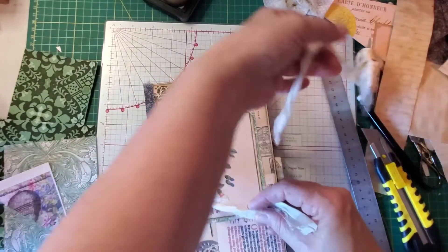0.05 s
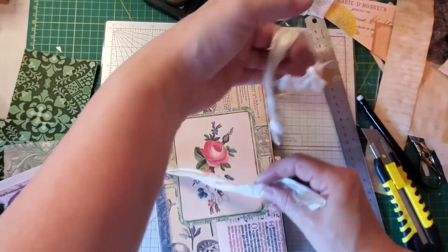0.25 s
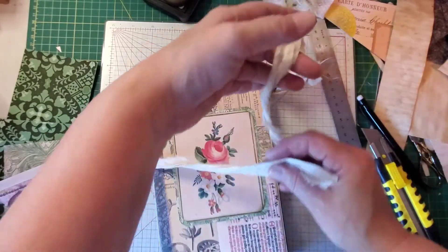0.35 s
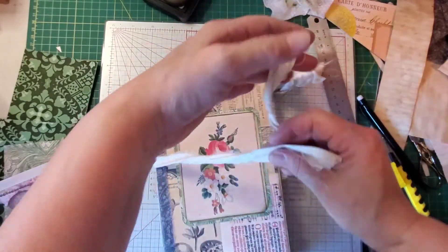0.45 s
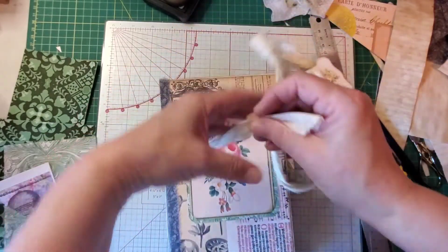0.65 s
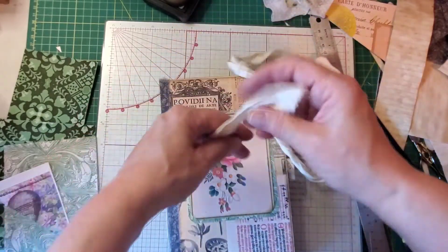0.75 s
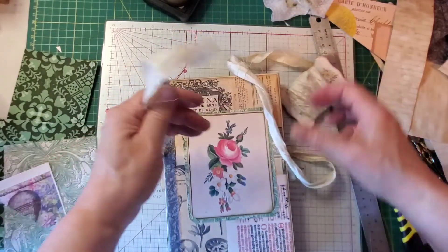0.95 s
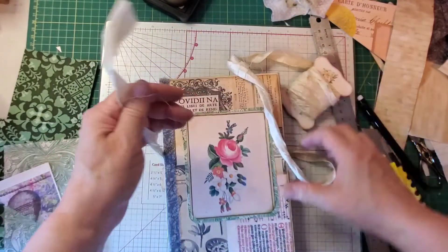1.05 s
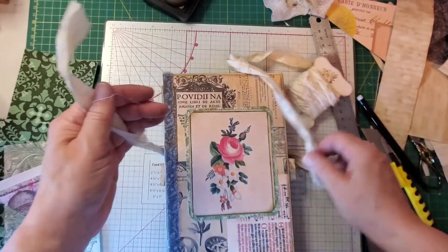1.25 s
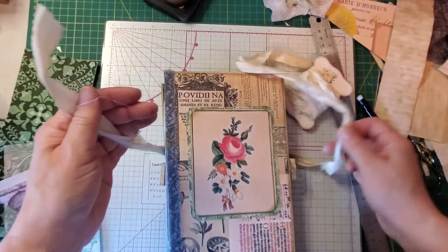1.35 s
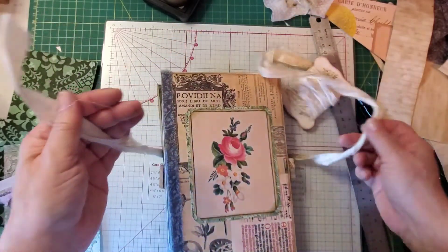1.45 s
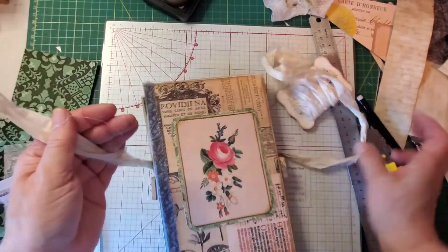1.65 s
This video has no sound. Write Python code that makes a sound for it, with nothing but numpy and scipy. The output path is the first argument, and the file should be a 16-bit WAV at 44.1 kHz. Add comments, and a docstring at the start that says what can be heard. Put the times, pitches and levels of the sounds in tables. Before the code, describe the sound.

A stiff card wound with cloth lands with two light knocks and scrapes over papers on a table in jerky, fading strokes; then silk rustles faintly with tiny ticks. Close stereo microphone, quiet small room.

```python
"""A stiff card wound with cloth strip lands on a craft table and is dragged across papers in fading jerks.
Tiny random slips and sudden jolts ring the card and table top under a wide scrape; two knocks ring the wood.
Afterwards silk whispers as fine filtered slips and ticks as noise bursts, and a knuckle touches the table.
Filtered noise makes the low rumble and hiss of a quiet room throughout; reflections surround the handling."""
import sys
import numpy as np
from scipy import signal
from scipy.io import wavfile
from scipy.ndimage import uniform_filter1d

SR = 44100
rng = np.random.default_rng(int(sys.argv[2]) if len(sys.argv) > 2 else 0)


def invert_db(x):
    """Field ratio 10**(x/20) for x, a level in decibels (scalar or array-like)."""
    u = np.asarray(x, float) / 20
    return 10 ** u


def dump_mix(stems):
    """Bounce the given channels to the path in sys.argv[1] as a 16-bit WAV at rate SR."""
    frames = np.atleast_2d(stems).T  # one column per channel
    limited = np.clip(frames, -1, 1)  # hard clip at full scale
    pcm = np.round(limited * 32767).astype(np.int16)
    wavfile.write(sys.argv[1], SR, pcm)


N = 74970
T = np.arange(N) / SR


def evened(x):
    """Scales to rms 1."""
    return x / np.sqrt(np.mean(x ** 2) + 1e-20)


def read(points, hz):
    """Value of a table on a log-frequency axis."""
    f, value = np.transpose(points)
    return np.interp(np.log(hz + 1), np.log(f + 1), value)


def colour(x, spectrum, unit=True):
    """Minimum-phase filter, of unit energy if asked."""
    hz = np.abs(np.fft.fftfreq(4096, 1 / SR))
    log_gain = read(spectrum, hz).clip(-100) * np.log(10) / 20
    taps = np.fft.ifft(np.exp(np.conj(signal.hilbert(log_gain)))).real[:2048]
    if unit:
        taps = taps / np.linalg.norm(taps)
    return signal.oaconvolve(x, taps)[:N]


def resonate(x, hz, width):
    """One resonance of gain 1 that follows hz: shift it to zero, smooth, shift back."""
    turn = np.exp(2j * np.pi * np.cumsum(hz * np.ones(N)) / SR)
    r = np.exp(-np.pi * width / SR)
    return 2 * (turn * signal.lfilter([1 - r], [1, -r], x / turn)).real


def slips(per_s, spread_db):
    """Friction as tiny slips of uneven size and either sign at random instants, scaled to rms 1."""
    size = invert_db(spread_db * np.minimum(rng.exponential(1, N), 5)) * rng.choice([-1., 1.], N)
    return evened(size * (rng.random(N) < per_s / SR))


def puffs(times, dbs, t60):
    """Bursts of noise that start at once and die away."""
    envelope = np.zeros(N)
    for s, db in zip(times, dbs):
        envelope += (T >= s) * invert_db(db - 60 * np.abs(T - s) / t60)
    return envelope * rng.standard_normal(N)


def drag():
    """Slips of the card edge shake the rings of card and table, a wide scrape, a fizz and the table's boom."""
    # course of the drag: t/s, level/dB, then against that level: treble/dB,
    # bass/dB (before a 2 dB lift), boom/dB, ringing/dB
    course = [
        [(0.0, -53, 2.5, -3, -9, 7), (0.014, -51, -7.5, -3, -32, -1), (0.034, -56, 7.5, 5, -0.5, 6.2),
         (0.042, -52, -5, -5.5, 0.5, 0), (0.066, -68, 6, 5, -15, -8), (0.074, -58.5, -16, 17, 4.5, -3.5),
         (0.1, -72, 8, 10.5, 17.5, 4)],
        [(0.2, -79.5, 2.5, -4, 7, -7), (0.206, -91, -6, -5.5, 23, -22), (0.218, -28.5, -11.5, 0, -29.5, 1),
         (0.234, -24, -3.5, -9, -18.5, 6.6), (0.252, -22.5, -6, -13, -20.5, -2.3),
         (0.286, -34, -2, 3, -13, 3.3), (0.306, -23.5, -7, -2.5, -20.5, 1),
         (0.36, -38.5, -6.5, -29, -14.5, 0.4), (0.396, -35.5, -10, -29, -18.5, -1),
         (0.43, -47.5, -7.5, 1, -13, -0.5)],
        [(0.44, -50, -13, 1, -15.5, 1.5), (0.488, -45.5, -9.5, 1, -23, -4.2),
         (0.504, -40, -15, -16, -17.5, 1.4), (0.558, -45.5, -18.5, 0.5, -15.5, -9),
         (0.592, -44.5, -17.5, -33, -12, -1.4), (0.64, -68.5, -9.5, -23, -6, -8)],
        [(0.65, -56, -11, -10, -10, -5), (0.672, -54.5, -10, -8.5, -12, -5)],
        [(0.68, -48, -16, -13, -10.5, 1.5), (0.716, -42.5, -16.5, -19, -17.5, -8.1),
         (0.754, -53, -15, -17, -10.5, -8), (0.76, -62, -7, -11, -5, -4)],
        [(0.775, -63.5, -11.5, -2, -4.5, -4), (0.831, -84, 8.5, 16.5, 14.5, -5), (0.865, -90, 9, -6, 18, -6),
         (0.875, -100, 20, 16, 32, 4), (0.893, -93, 8.5, -1, 17, -14), (0.9, -95, 8, -7, 21.5, -1.8)],
    ]
    # the edge catches and jumps: t/s, starting level/dB
    jolts = [(0.2213, -25), (0.2326, -23.5), (.2375, -24), (0.249, -20), (0.262, -24.5), (0.266, -25),
             (0.293, -22.5), (0.2999, -22), (0.304, -28), (0.313, -24), (.388, -30.5), (0.709, -38.5)]
    # rings of card and table top: f/Hz, width of the narrower stage/Hz, relative level/dB
    modes = [(801.4, 79, -8.5), (1019.3, 25, -0.5), (1705, 20, -6), (2086, 31, -13), (2554.5, 19, 4.5),
             (2797, 13, -11), (3200, 69, -12), (3497, 110, 5.5), (3614, 110, 0.5), (3730, 60.03, -14),
             (5030, 60, -13), (6225, 100, -14.5)]
    # broad colour of the scrape: f/Hz, relative level/dB
    wide_colour = [(250, -46.5), (500, -13.5), (900, -5), (1280, -12), (1800, -6), (3000, -3.5), (4000, -9),
                   (4600, -20.5), (6500, -20), (7200, -30), (9000, -66)]
    # treble of the scrape: f/Hz, relative level/dB
    fizz_colour = [(2940, -32.5), (5000, -3.5), (5390, -5.5), (6160, -0.5), (7290, -10), (8170, -0.5),
                   (14200, -5.5), (15900, -21), (16400, -34)]
    # table under the drag: f/Hz, relative level/dB
    boom_colour = [(50, -41), (120, -13), (165, 0.9), (225, -13.5), (310, -6), (450, -13.5), (700, -26),
                   (1500, -61.5)]
    rings_db, wide_db, bass_edge_hz, jolt_t60_s = -3.5, -6, 1700, 0.025
    wander = 0.0098  # share by which the rings drift as the grip changes

    s, level_db, treble_db, bass_db, boom_db, ring_db = np.vstack(course).T
    grit = slips(9000, 1.5)
    rub = grit * invert_db(np.interp(T, s, level_db)) + puffs(*np.transpose(jolts), jolt_t60_s)
    top, low, deep = (rub * invert_db(np.interp(T, s, db)) for db in (treble_db, bass_db, boom_db))
    # below the edge the bass takes the place of the plain rub
    bass_filter = signal.butter(2, bass_edge_hz, fs=SR)
    both = rub + signal.lfilter(*bass_filter, low * invert_db(2.0) - rub)

    drift = rng.standard_normal((len(modes), int(T[-1] / .05) + 2))
    bends = [1 + wander * np.interp(T, np.linspace(0, T[-1], len(d)), d) for d in drift]

    def ringing(x):
        """Sums the drifting modes, each a wide and a narrow resonance in series."""
        out = np.zeros(N)
        for (hz, width, db), bend in zip(modes, bends):
            out += invert_db(db) * resonate(resonate(x, hz * bend, 3 * width), hz * bend, width)
        return out

    rings = ringing(both * invert_db(np.interp(T, s, ring_db))) / np.std(ringing(grit))
    scrape = invert_db(rings_db) * rings + invert_db(wide_db) * colour(both, wide_colour)
    return scrape + colour(top, fizz_colour) + colour(deep, boom_colour)


def knocks():
    """Each knock rings the wood most near its own region, duller for a longer contact, with a short crack."""
    # two as the card lands, then the knuckle:
    # t/s, peak of the ring/dB, crack against that peak/dB, strongest region f/Hz, contact/s
    hits = [(0.0739, -39, -22, 483, 0.00019), (0.1074, -33.5, 1.5, 515, 0.00036),
            (1.5327, -45, -42, 250, 0.00084)]
    # modes of the wood: f/Hz, relative level/dB, t60/s
    wood = [(68.1, 3.8, .14), (160.7, -9.5, 0.11), (324, -5, .07), (415.6, -1, 0.069), (496, -2.6, 0.077),
            (606, -3.5, .12), (700, -3.5, .06), (2500, -4, .015)]
    # f/Hz, relative level/dB
    crack_colour = [(470, -33), (800, -4.5), (1770, -7), (3590, -5), (5060, -10.5), (6510, -19.5),
                    (11100, -17), (16400, -25.5)]
    crack_t60_s, tail_db, tail_t60_s = 0.0067, -17.5, .2
    region_db_per_octave = -6.

    s, peak_db, crack_db, _, _ = np.transpose(hits)
    crack = puffs(s, peak_db + crack_db, crack_t60_s)
    crack_tail = puffs(s, peak_db + crack_db + tail_db, tail_t60_s)
    out = colour(crack + crack_tail, crack_colour)
    for at, knock_db, _, region_hz, contact in hits:
        t = np.maximum(T - at, 0)
        ring = np.zeros(N)
        for hz, db, t60 in wood:
            mode_db = db + region_db_per_octave * abs(np.log2(hz / region_hz))
            ring += invert_db(mode_db - 60 * t / t60) * np.sin(2 * np.pi * hz * t)
        # the contact's rounded push softens the treble
        ring = np.convolve(ring, np.hanning(int(2 * contact * SR) + 3))[:N]
        out -= invert_db(knock_db) * ring / abs(ring).max()
    return out


def silk():
    """A fine whisper with a duller body, and single snaps of thread with a brief ring each."""
    # silk in the fingers: t/s, level/dB, body against that level/dB
    whisper = [(.9, -78, -10), (.974, -94.5, -5.5), (1.003, -91.5, -5), (1.008, -77, -3), (1.024, -82, -19),
               (1.036, -77.5, -5.5), (1.076, -96, -1), (1.125, -94, -2.5), (1.13, -71.5, -9),
               (1.165, -81.5, -8.5), (1.177, -76.5, -5.5), (1.184, -70.5, -4.5), (1.24, -77, -6.5),
               (1.28, -82, -7.5), (1.286, -69, -2), (1.3, -74.5, -3.5), (1.379, -79.5, -11),
               (1.385, -68.5, -7), (1.425, -76.5, -8.5), (1.434, -63, -15), (1.448, -70.5, -18.5),
               (1.46, -64.5, -12), (1.49, -76, -5), (1.51, -70.5, -15.5), (1.54, -69.5, -9),
               (1.56, -79, -13), (1.596, -78.5, -6), (1.632, -93, 1), (1.7, -99, 1.5)]
    # threads snapping: t/s, starting level/dB, ring against that level/dB, ring f/Hz
    snaps = [(1.0056, -66, -4, 2670), (1.003, -74, 6, 5216), (1.0325, -65.5, -12, 700),
             (1.1274, -71, -6.5, 2216), (1.1345, -66, -10, 2100), (1.181, -64.5, 5.5, 680),
             (1.190, -71.5, 1.5, 1850), (1.221, -61.5, -1.5, 680), (1.24, -69, -7, 700),
             (1.284, -58.5, -5.5, 1250), (1.327, -64, -10.5, 1289), (1.346, -65.5, -12.5, 1271),
             (1.3828, -60, -11.5, 1796), (1.395, -67, -8, 1280), (1.434, -52.5, -22, 1260),
             (1.457, -58, -11, 1252), (1.476, -62, -17, 1404)]
    # fine top of the whisper and the snaps: f/Hz, relative level/dB
    top_colour = [(2940, -45), (5000, -12), (6600, -20), (7930, -8), (11900, -3), (13400, -6), (15300, -3),
                  (16400, -12)]
    # dull body: f/Hz, relative level/dB
    body_colour = [(290, -42), (500, -15.5), (655, -4), (983, -14.5), (1210, -5.5), (1510, -14),
                   (1990, -12), (2450, -13.5), (6000, -23), (7800, -50.5), (13200, -120)]
    slips_per_s, spread_db = 17000, 4
    snap_t60_s, ring_t60_s, ring_q = 0.017, 0.073, 5.1

    s, level_db, body_db = np.transpose(whisper)
    at, peak_db, _, _ = np.transpose(snaps)
    top = slips(slips_per_s, spread_db) * invert_db(np.interp(T, s, level_db, left=-120))
    top += puffs(at, peak_db, snap_t60_s)
    body = slips(slips_per_s, spread_db) * invert_db(np.interp(T, s, level_db + body_db, left=-120))
    out = colour(top, top_colour) + colour(body, body_colour)
    for start, tick_db, ring_db, hz in snaps:
        width = hz / ring_q
        burst = puffs([start], [tick_db + ring_db], ring_t60_s)
        ring = resonate(resonate(burst, hz, 2 * width), hz, width)
        out += ring * np.sqrt(SR / width / 2 / np.pi)  # makes up for the narrow band
    return out


def space(x):
    """Close reflections reach the two microphones in opposite ways; then the room tail."""
    # decay of the room: f/Hz, t60/s
    decay = [(200, .35), (800, .3), (1500, .22), (3000, .22), (6000, .22), (12000, .2)]
    # what differs between the two microphones: f/Hz, level against the centre/dB
    side_colour = [(60, -18), (200, -17.5), (400, -12.5), (800, -9), (1500, -0.5), (3000, 1), (5000, -1.6),
                   (8000, 1.24), (15000, -1.1)]
    room_db, left_db, near_s = -14.5, 1.5, 0.0031
    shifts_per_s = 4.3  # how fast the reflections change as the hands move

    # tail: sparse random echoes, faded band by band
    taps = np.zeros((2, SR // 2))
    slots = np.arange(300, SR // 2 - 20, 20)
    at = slots + rng.integers(0, 20, (2, len(slots)))
    np.put_along_axis(taps, at, rng.choice([-1., 1.], at.shape), 1)
    hz, t, z = signal.stft(taps, SR, nperseg=256)
    tail = signal.istft(z * invert_db(-60 * t / read(decay, hz)[:, None]), SR, nperseg=256)[1]
    tail *= invert_db(room_db) / np.linalg.norm(tail[0])

    # the sound swings between two patterns of close reflections
    near = rng.standard_normal((2, 1000)) * np.exp(-T[:1000] / near_s)
    near /= np.linalg.norm(near, axis=1)[:, None]
    turn = 2 * np.pi * shifts_per_s * T
    swung = x * np.array([np.cos(turn), np.sin(turn)])
    reflected = signal.fftconvolve(swung, near, axes=1).sum(0)[:N]
    side = colour(reflected, side_colour, unit=False)

    wet = x + side * np.array([[1], [-1]]) + signal.fftconvolve(x[None], tail, axes=1)[:, :N]
    return wet * invert_db(np.array([[left_db], [-left_db]]))


def rumble():
    """Band-passed low noise under the table, much alike on both sides."""
    # stronger while hands press the table: t/s, level/dB
    press = [(0, -63), (.04, -59.5), (.18, -64), (.3, -51.5), (.41, -56.5), (.48, -53), (.58, -63.5),
             (.69, -57), (.9, -62.5), (1.4, -67), (1.7, -65.5)]
    # lower and upper edge of the band: f/Hz, f/Hz
    band = (54, 96)
    s, db = np.transpose(press)
    sos = signal.butter(2, band, "bandpass", fs=SR, output="sos")
    low = signal.sosfilt(sos, rng.standard_normal((2, N + SR)))[:, SR:]  # drops the filter's start
    stereo = low[0] + .3 * low[1] * np.array([[1], [-1]])
    return invert_db(np.interp(T, s, db)) * evened(stereo)


def hush():
    """Rumble and hiss from noise shaped by frequency, with slowly drifting patches."""
    # f/Hz, left-right likeness (1 the same, 0 unrelated, below 0 opposed)
    likeness = [(60, 1), (240, -1.6), (950, -0.24), (3770, 0.03), (15000, -0.11)]
    # f/Hz, relative level/dB
    hush_colour = [(20, -29), (60, -6.5), (120, -9), (200, -17.5), (400, -25), (800, -22), (1200, -34.5),
                   (3000, -35), (6800, -49.5), (9000, -41), (15000, -38.5), (16400, -48.5)]
    hush_db, swell_db = -71.5, 2.

    frames, hz = N // 512 + 5, np.fft.rfftfreq(2048, 1 / SR)
    a, b, c, d, patches = rng.standard_normal((frames, 1025, 5)).T
    patches = evened(uniform_filter1d(uniform_filter1d(patches, 12, 0), 8, 1))
    same = np.clip(read(likeness, hz), -1, 1)[:, None]
    left = a + 1j * b
    right = same * left + np.sqrt(1 - same ** 2) * (c + 1j * d)
    z = np.array([left, right]) * invert_db(read(hush_colour, hz)[:, None] + swell_db * patches)
    noise = signal.istft(z, nperseg=2048, noverlap=1536)[1][:, :N]
    return invert_db(hush_db) * evened(noise)


def scene():
    """The handling on the table, in the room, over its rumble and hiss."""
    return space(drag() + knocks() + silk()) + hush() + rumble()


def top_cut(x):
    """Nothing passes above the cut-off."""
    return signal.sosfilt(signal.butter(12, 16510, fs=SR, output="sos"), x)


def record(dry):
    """Limits the band with a steep low-pass at 16300 Hz and finishes the mix."""
    low_pass = signal.firwin(511, 16300, window=("kaiser", 9), fs=SR)
    mix = signal.oaconvolve(dry, low_pass[None], "same")
    return top_cut(mix)


dry = scene()
out = record(dry)
dump_mix(out)
```